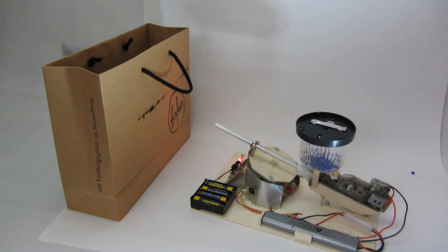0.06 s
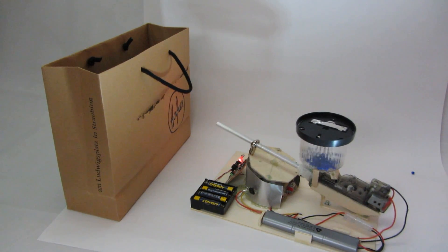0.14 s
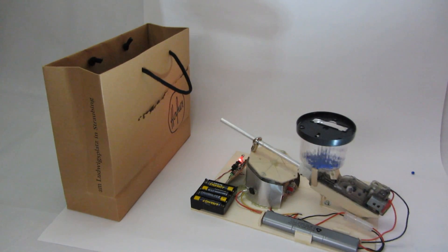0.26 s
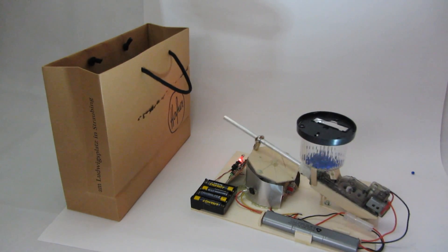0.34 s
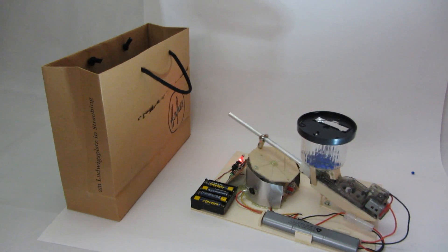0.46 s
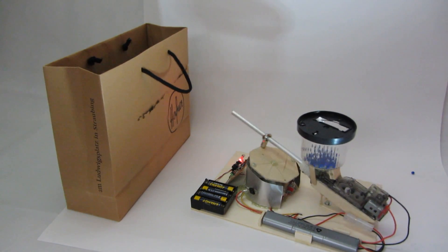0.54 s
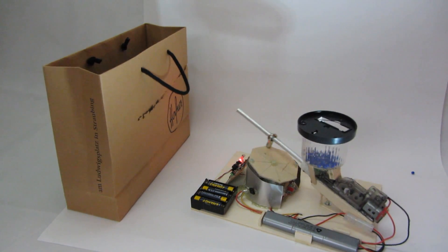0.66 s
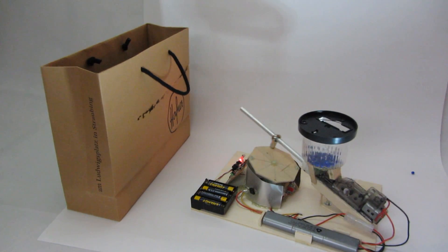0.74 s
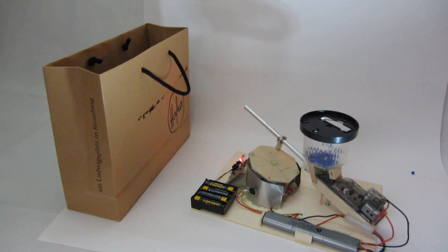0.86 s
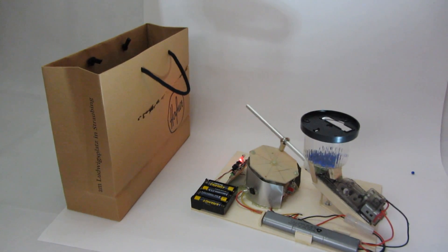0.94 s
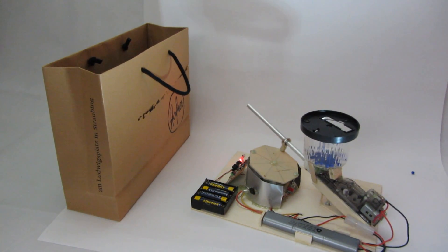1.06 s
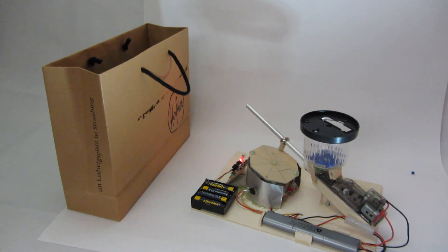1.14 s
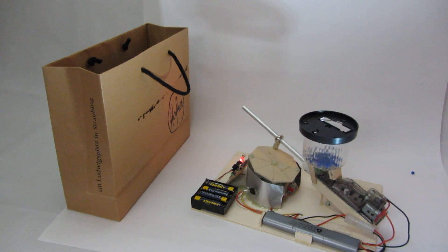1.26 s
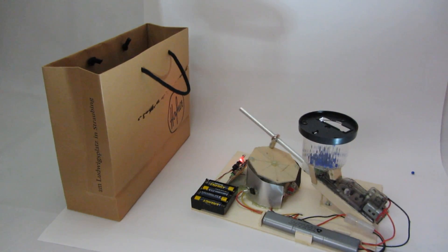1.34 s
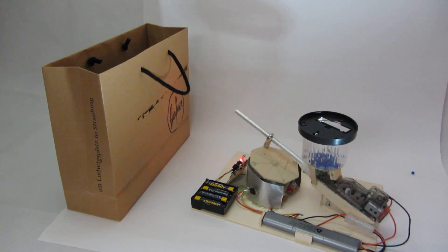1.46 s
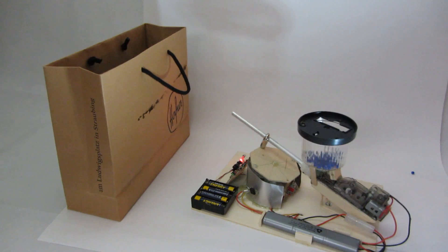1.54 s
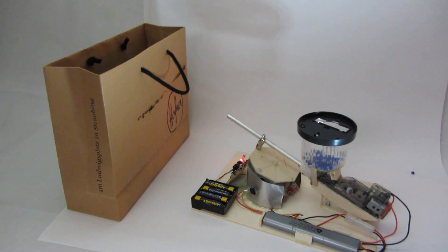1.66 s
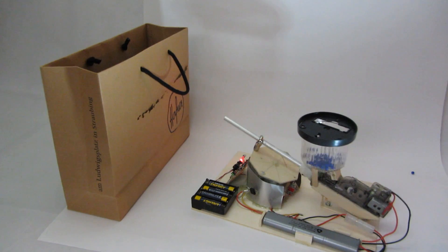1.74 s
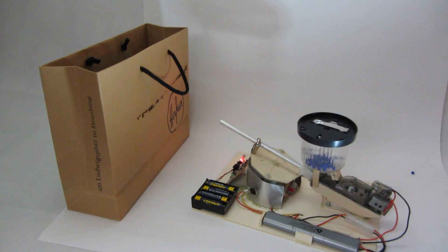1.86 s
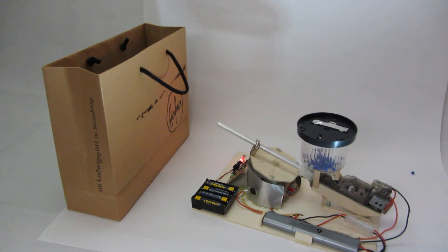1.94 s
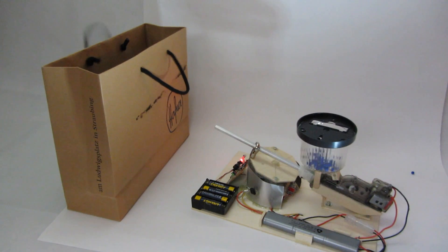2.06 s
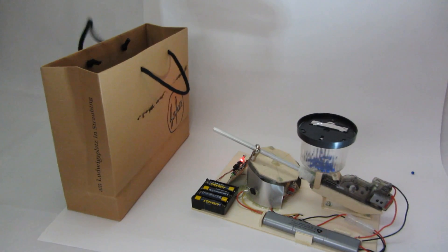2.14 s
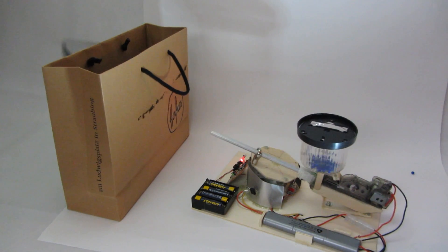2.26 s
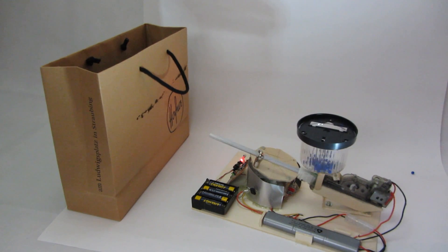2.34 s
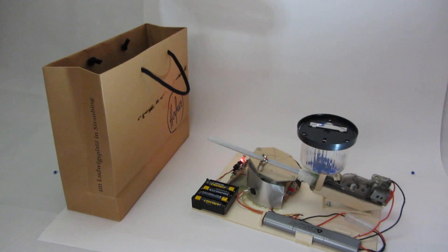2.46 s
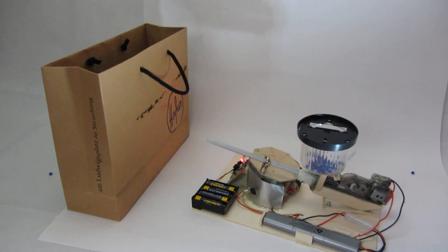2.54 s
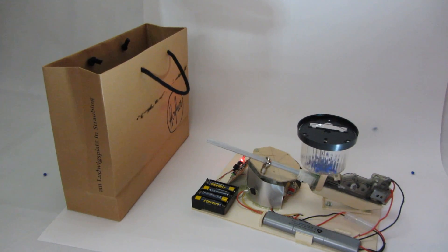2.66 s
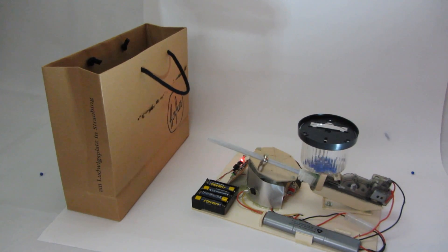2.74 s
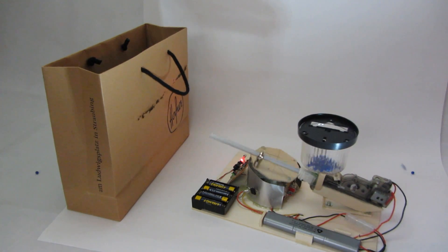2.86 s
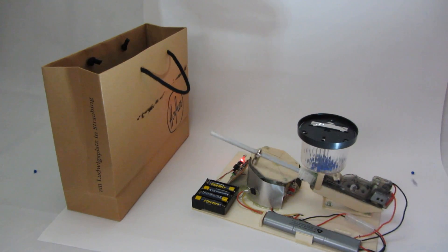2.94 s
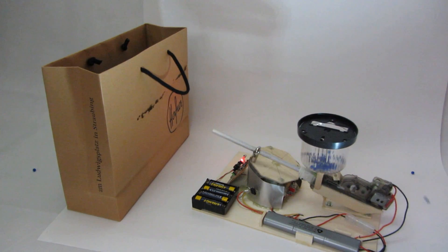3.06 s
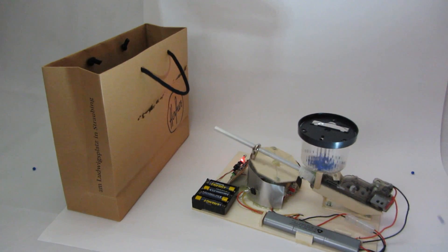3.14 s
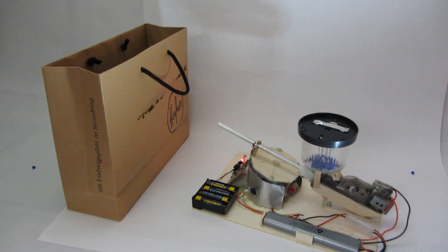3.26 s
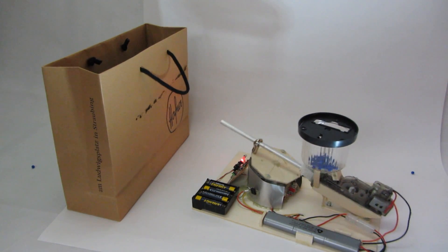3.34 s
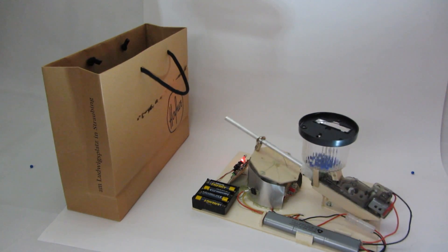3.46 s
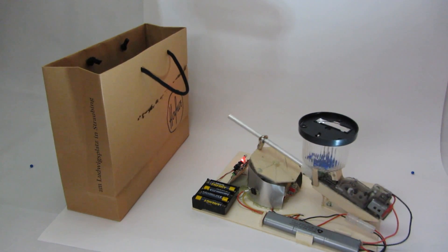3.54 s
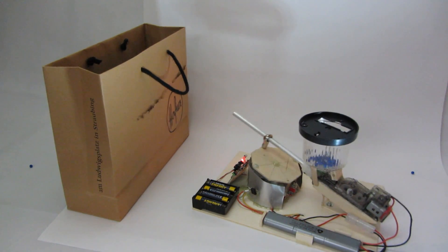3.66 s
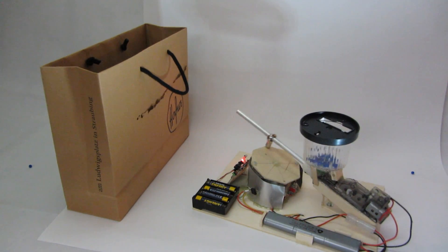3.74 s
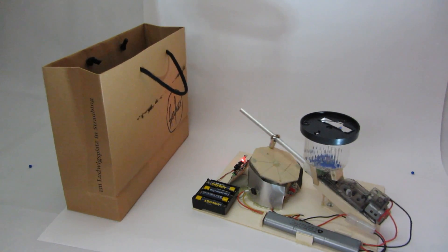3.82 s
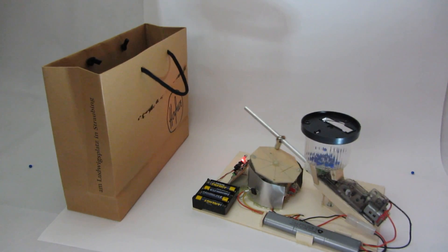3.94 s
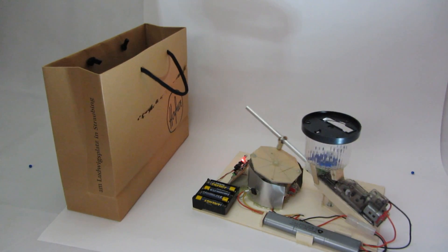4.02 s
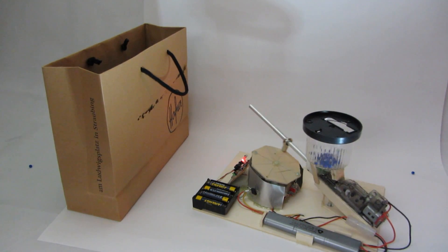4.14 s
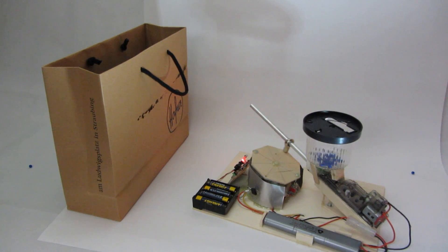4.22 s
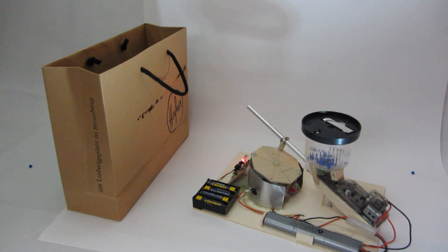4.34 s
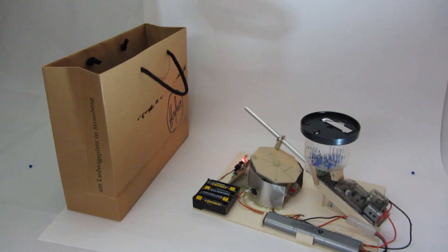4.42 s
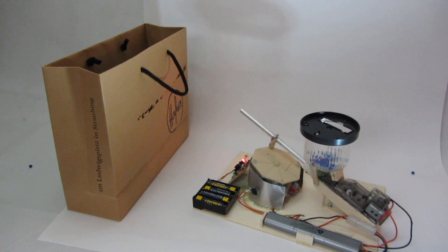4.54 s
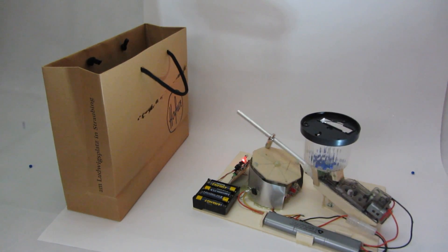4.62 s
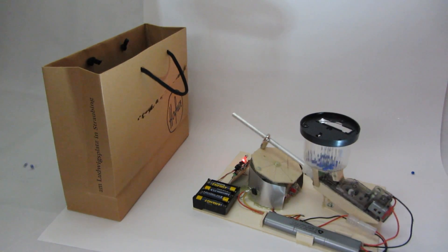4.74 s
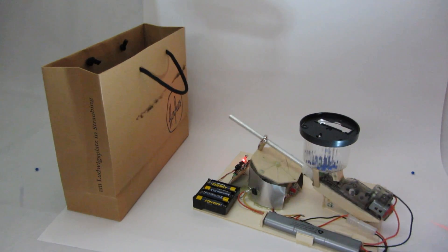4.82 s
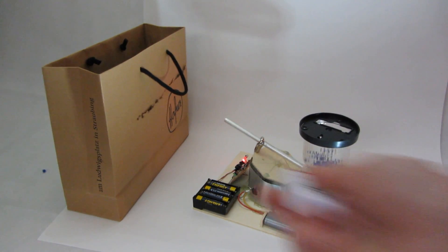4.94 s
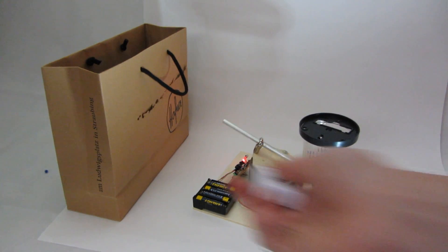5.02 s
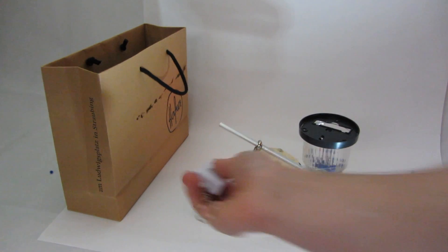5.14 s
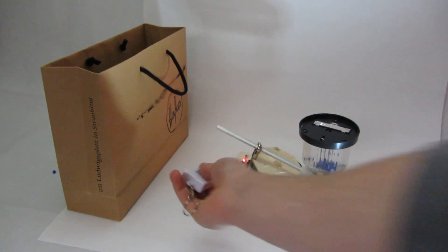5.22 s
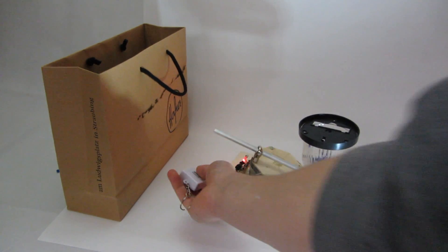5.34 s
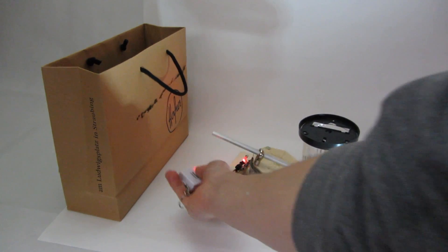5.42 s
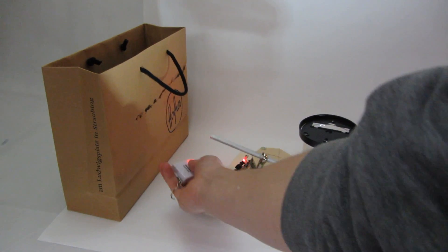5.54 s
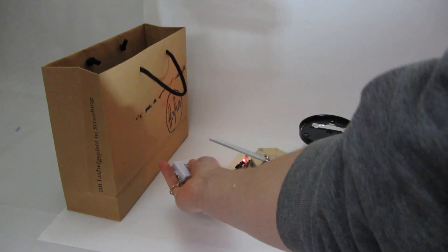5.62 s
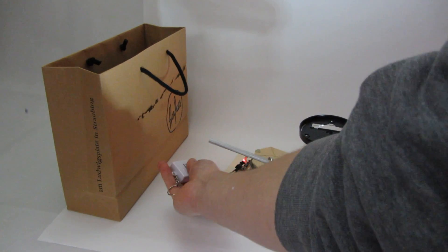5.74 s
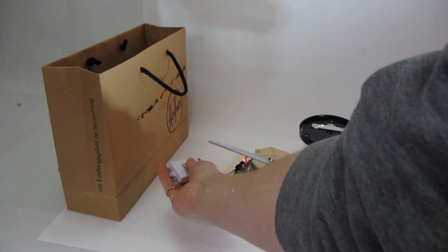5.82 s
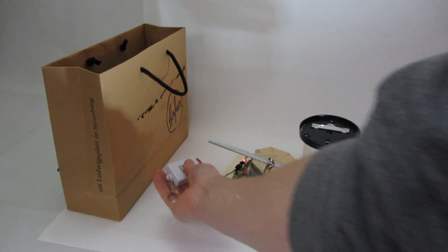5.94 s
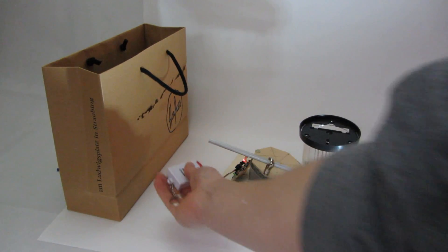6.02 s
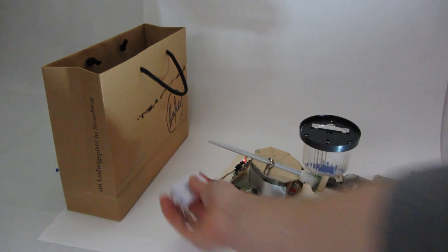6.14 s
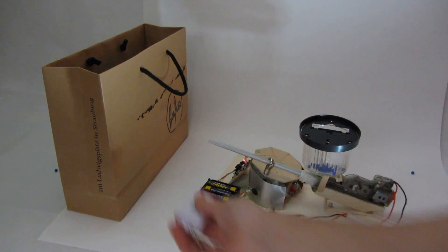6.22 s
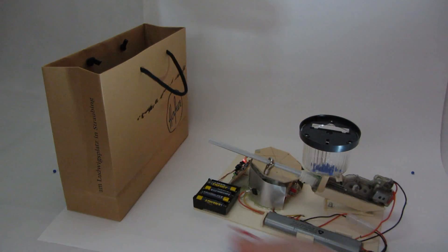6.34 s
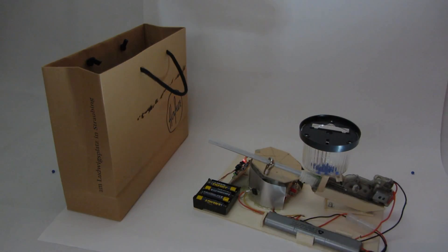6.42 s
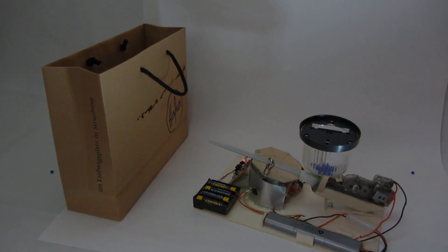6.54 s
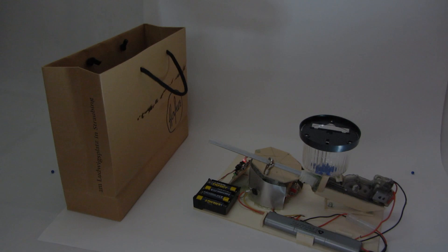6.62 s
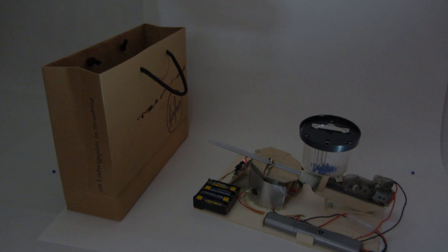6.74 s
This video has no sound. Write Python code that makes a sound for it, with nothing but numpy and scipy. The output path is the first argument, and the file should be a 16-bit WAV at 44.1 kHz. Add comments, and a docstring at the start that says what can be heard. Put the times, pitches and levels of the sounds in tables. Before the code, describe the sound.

From 0 to about 5.7 seconds a small electric pellet gun fires without pause, some eight shots a second, evenly spaced but slightly different each time. Every cycle has a hard gear clack, then about 20 milliseconds later a chattering release, piston slam and short papery slap as the pellet hits a bag. The frame rings briefly and brightly, around 3 kHz. Between shots a gritty geared whirr swells with the spring load, and pellets rebound with small cracks and dull knocks. Irregular muzzle puffs pop the microphone, strongly around 0.5, 1.7, 2.2, 3.4, 4.8 and 5.2 seconds. At 5.7 the trigger is released and the whirr drops away within a few tenths. From 5.9 to 6.7 quiet stray pellets tick and roll on paper and board, thinning over faint rustle and fading room hush. Close stereo, slightly stronger right, short indoor reflections.

```python
"""A small motor-driven pellet gun on a board fires eight shots a second into a paper bag, indoors, in stereo.
In each cycle a gear catches the piston, the spring lets go and the piston slams home: impacts excite frame
modes. The pellet then slaps the bag, muzzle air puffs at the microphone ports, and pellets rebound as grain
bursts. The geared whirr follows the spring load until the trigger is let go and it dies away. Last, stray
pellets roll and tick as decaying noise while the filtered-noise hush fades out."""
import sys
import numpy as np
from scipy import signal
from scipy.fft import rfft, irfft, next_fast_len
from scipy.io import wavfile

SR = 44100
rng = np.random.default_rng(int(sys.argv[2]) if len(sys.argv) > 2 else 0)


def undo_db(level):
    """Turn decibels back into plain size, where 20 dB means ten times bigger."""
    steps = np.asarray(level, float) / 20
    return 10 ** steps


def materialize(psi):
    """Save the field psi as 16-bit PCM at rate SR to the path in sys.argv[1].

    A 1-D psi becomes a single channel; in a 2-D psi each row is a channel.
    """
    bounded = np.clip(np.atleast_2d(psi).T, -1, 1)
    quanta = np.round(bounded * 32767).astype(np.int16)
    wavfile.write(sys.argv[1], SR, quanta)


N = 298998  # samples
RELEASE_S = 5.705  # the trigger is let go


def rms_one(x):
    """Normalisation: scale to unit rms."""
    return x / np.sqrt(np.mean(x ** 2) + 1e-20)


def colour(x, points):
    """Minimum-phase filtering: a folded cepstrum gives a causal, unit-energy response along a spectrum table."""
    hz, level_db = np.transpose(points)
    grid = np.maximum(np.arange(1025) * SR / 2048, 1)
    log_gain = np.log(undo_db(np.interp(np.log(grid), np.log(hz), level_db)))
    cepstrum = irfft(log_gain)
    cepstrum[1:1024] *= 2
    cepstrum[1025:] = 0
    taps = irfft(np.exp(rfft(cepstrum)))
    taps = taps / np.sqrt(np.sum(taps ** 2))
    return signal.oaconvolve(x, taps * np.ones(x.shape[:-1] + (1,)), axes=-1)[..., :N]


def split(x, hz):
    """Band splitting: third-order parts below and above a frequency."""
    return [signal.sosfilt(signal.butter(3, hz, kind, fs=SR, output="sos"), x) for kind in ("low", "high")]


def resonate(x, hz, width_hz):
    """Forced resonance: one damped pole pair with a gain of about 1 at its peak."""
    r = np.exp(-np.pi * width_hz / SR)
    return signal.lfilter([1 - r, 0, r - 1], [1, -2 * r * np.cos(2 * np.pi * hz / SR), r * r], x)


def clicks(s, gains):
    """Impulse excitation: single samples at the given times."""
    out = np.zeros(N)
    places = np.clip(np.round(np.asarray(s) * SR).astype(int), 0, N - 1)
    np.add.at(out, places, gains)
    return out


def swell(train, rise_s, fall_s):
    """Relaxation: two first-order lags turn each click into a quick rise and an exponential fall."""
    a, b = np.exp(-1 / (rise_s * SR)), np.exp(-1 / (fall_s * SR))
    falling = signal.lfilter([1], [1, -b], train + 1e-18)
    return signal.lfilter([1 - a], [1, -a], falling)


def grains(per_s, spread_db, apart=0.89):
    """Shot noise: random impacts of uneven size, partly shared by the two ports, normalised to unit rms."""
    sizes = undo_db(spread_db * np.minimum(rng.exponential(1, (3, N)), 5)) * rng.choice([-1, 1], (3, N))
    shared, *own = sizes * (rng.random((3, N)) < per_s / SR)
    own = signal.lfilter([1.5, -.8], [1], own)  # the sides are less alike in the treble
    return rms_one(shared + apart * own)


def strike(s, db, modes, scatter_db):
    """Modal superposition: each blow starts decaying sines within 1.2 ms, in strengths that vary by blow and port."""
    out = np.zeros((2, N))
    chance = rng.standard_normal((len(s), len(modes), 3))
    late = rng.random((len(s), len(modes)))
    for k, (hz, level_db, t60) in enumerate(modes):
        r, w = undo_db(-60 / (t60 * SR)), 2 * np.pi * hz / SR
        blow_db = db + level_db + scatter_db * chance[:, k, 0]
        trains = [clicks(s + .0012 * late[:, k], undo_db(blow_db + 4.1 * chance[:, k, side])) for side in (1, 2)]
        out += signal.lfilter([0, np.sin(w)], [1, -2 * r * np.cos(w), r * r], np.array(trains) + 1e-18)
    return out


# firing cycles: gear catch t/s, relative catch level/dB, slam delay/ms, relative slam level/dB, relative slap level/dB
CYCLES = [(.0003, -11, 21.5, -23, -16), (0.1262, -10, 21, -18.5, -19.5), (0.2509, -13, 22.3, -17.5, -18.5),
          (0.375, -11.5, 24, -15.5, -19), (0.5014, -10.5, 24, -16.5, -20), (.6269, -11, 23.6, -14.5, -20),
          (0.7526, -11.5, 23.2, -17.5, -21.5), (.878, -11, 21.5, -16.5, -22), (1.0042, -10, 24, -16.5, -23),
          (1.1324, -12.5, 21.8, -18.5, -19.5), (1.2604, -11, 23.6, -20.5, -23.5),
          (1.3858, -10.5, 23.5, -15, -18), (1.51, -10.5, 23, -13, -20), (1.6343, -11, 24.2, -19, -16),
          (1.7609, -13, 22.7, -15.5, -15.5), (1.8863, -12, 25.3, -18.5, -15),
          (2.0126, -12, 23.6, -17, -18.5), (2.1381, -11.5, 18.6, -20, -21.5),
          (2.2636, -14.5, 20.3, -18.5, -21.5), (2.388, -15, 21.7, -17.5, -25),
          (2.5126, -13.5, 22.5, -18, -20.5), (2.6378, -13, 21.7, -16.5, -20.5),
          (2.7614, -13.5, 21.8, -19, -21.5), (2.8846, -12.5, 20.7, -18.5, -21),
          (3.01, -14.5, 20.2, -18.5, -21.5), (3.1354, -13, 22.4, -16.5, -23), (3.261, -11, 23.6, -13, -19),
          (3.3855, -10, 23.3, -16, -19), (3.5136, -11.5, 22.7, -17, -22.5), (3.6406, -10, 24.6, -20, -18.5),
          (3.7665, -11.5, 24, -14, -19), (3.8925, -12.5, 20.6, -18, -17), (4.017, -9, 21.4, -14.5, -20.5),
          (4.1425, -9.5, 24, -16.5, -20), (4.2705, -11, 21.4, -16, -20), (4.3964, -10, 22.2, -20, -19.5),
          (4.5218, -9.5, 21.3, -18.5, -19.5), (4.647, -9.5, 21, -21, -20.5),
          (4.7719, -11, 23.4, -13.5, -22), (4.8968, -12, 22.4, -17, -22), (5.0226, -14.5, 25.5, -16, -21),
          (5.1496, -12, 22.5, -26, -16), (5.2754, -13.5, 22.7, -16, -24), (5.399, -15, 21.4, -23, -20.5),
          (5.5247, -16.5, 21.3, -19, -17.5), (5.6503, -14.5, 19.9, -27, -19)]
# free vibrations of the gun frame: f/Hz, relative level/dB, T60/s
FRAME_MODES = [(872, -15, 0.053), (1373, -3.5, 0.031), (2480, -31, 0.0079), (2780, 0.5, 0.017),
               (2965, 0, 0.023), (3340, 1.5, .025), (4336, 1.5, 0.015), (4710, -1, 0.016),
               (5640, -24, .012), (6680, -6, 0.031), (7640, -2, 0.025), (8312, -43, .01)]
# spectrum of hard contacts: f/Hz, relative level/dB
CRACK_SPECTRUM = [(59, -56), (100, -18.5), (1360, -5), (2220, -4), (3050, -2.5), (3940, -10.5),
                  (4570, -8.5), (5900, -7), (8460, -10.5), (12000, -30), (16000, -30)]


def mechanism():
    """Impact excitation: touch, catch with two bounces, release chatter and slam with rebound ring the frame."""
    s, catch_db, slam_ms, slam_db, _ = np.transpose(CYCLES)
    slam = s + slam_ms / 1000
    contacts = np.concatenate([s - .0013, s + 0.00019, s + .0042, s + 0.0079, slam, slam + 0.0052])
    db = np.concatenate([catch_db - 8, catch_db, catch_db - 6.0, catch_db - 11, slam_db + 6.5, slam_db + 5.5])
    burst = swell(clicks(contacts, undo_db(db + 3.0)), 0.00067, 0.002) * grains(20000, spread_db=2.0)
    crack = colour(burst, CRACK_SPECTRUM)

    # the last gear tooth slips off: a growing chatter rings the frame near 3 kHz and, less, near 1.7 kHz
    luck_db = 4 * rng.uniform(-0.84, 1, len(s))  # from shot to shot
    slips = [(.016, -4.5), (0.0187, 6)]  # time after the catch/s, relative level/dB
    chatter = swell(sum(clicks(s + after, undo_db(slip_db + luck_db)) for after, slip_db in slips), 0.0013, 0.0019)
    chatter = chatter * grains(9000, spread_db=2.5)
    ring = resonate(chatter, 3060, 360) + undo_db(-8.5) * resonate(chatter, 1680, 500)
    ring = ring + undo_db(-30) * colour(chatter, CRACK_SPECTRUM)
    return crack + ring + strike(contacts, db - 11, FRAME_MODES, scatter_db=1.8)


# free vibrations of the paper bag: f/Hz, relative level/dB, T60/s
BAG_MODES = [(178, -23.5, 0.051), (262, -14, 0.1), (371, -2.5, 0.12), (438, -6.5, 0.07), (545, -3.5, 0.1),
             (658, -6.5, 0.044), (819.5, -7.5, 0.19), (1150, -18, 0.032), (1430, -25, 0.071),
             (1640, -1, 0.065), (1900, 0, 0.029)]
# spectrum of shaken paper: f/Hz, relative level/dB
PAPER_SPECTRUM = [(59, -40.5), (100, -10.5), (736, -1), (1390, 3), (2800, 4.5), (3780, -5.5), (5900, -2),
                  (9020, -8.5), (12000, -22), (16000, -22)]


def bag_slap():
    """Membrane excitation: pellet and muzzle air shake the paper into brief crackle over its ringing modes."""
    s, slam_ms, bag_db = np.transpose(CYCLES)[[0, 2, 4]]
    hit = s + slam_ms / 1000
    crackle = swell(clicks(hit, undo_db(bag_db + 11.5)), 0.0032, 0.0082) * grains(9000, spread_db=2.0)
    crackle = split(colour(crackle, PAPER_SPECTRUM), 130)[1]
    return crackle + strike(hit + .003, bag_db - 11, BAG_MODES, scatter_db=4.0)


# strong puffs of muzzle air at the microphone ports: centre t/s, left level/dB, right level/dB, width/ms
PUFFS = [(.025, -23, -14.5, 1.9), (0.1503, -15, -20, 1.9), (0.5305, -10, -10, 2.6),
         (0.6563, -11.5, -10, 2.8), (.906, -18, -12, 3.7), (1.416, -22, -10.5, 5.6),
         (1.6602, -15, -4.5, 2.2), (1.7852, -18, -14.5, 5.3), (2.1646, -11, -2, 2.8),
         (2.2914, -6.5, -3.5, 5.2), (3.2897, -12, -8.5, 2.4), (3.414, -3.5, -27, 3.4),
         (3.6661, -34, -11, 1.7), (3.7942, -29, -14, 1.5), (3.9222, -11, -13, 4.6),
         (4.672, -18, -17.5, 1.9), (4.8016, -6, -8, 4.5), (4.929, -13, -7.5, 3.3), (5.0501, -25, -9, 2.8),
         (5.1781, -16, -4.5, 3.6), (5.306, -14, -7, 2.1)]


def port_pops():
    """Pressure pulses: muzzle air pushes the ports in opposite senses, faintly after every slam, at times strongly."""
    out = np.zeros((2, N))
    s, slam_ms = np.transpose(CYCLES)[[0, 2]]
    faint_db = -21 + 3.0 * rng.standard_normal((len(s), 2))
    faint = np.column_stack([s + slam_ms / 1000 + 0.00338, faint_db, np.full(len(s), 1.63)])
    for at, left_db, right_db, width_ms in np.concatenate([faint, PUFFS]):
        push = rng.choice([-1, 1]) * np.hanning(round(width_ms * SR / 1000)) ** 0.44
        i = round(at * SR) - len(push) // 2
        out[:, i:i + len(push)] += np.outer([undo_db(left_db), -undo_db(right_db)], push)
    return out


# pellets rebounding between shots: t/s, relative level/dB, brightness/dB
REBOUND_HITS = [(0.0631, -11.5, 10), (0.446, -16, 16), (.8384, -25, 12), (0.9552, -19, 14),
                (1.0877, -19, 11), (1.2047, -14, 12), (1.3298, -19, 17.5), (1.5, -17, 14),
                (2.3322, -18, 18), (2.4493, -15.5, 10), (2.506, -21, 12), (2.5644, -8, 3.5),
                (2.697, -17, 15), (2.821, -11, 17), (2.945, -16.5, 13), (3.0709, -13.5, 16.5),
                (3.108, -18, 19.5), (3.1203, -18, 0), (3.1954, -15, 10), (3.3285, -13, 10),
                (3.864, -22, -6), (3.968, -12, 11), (4.0837, -10, 11.5), (4.1298, -10.5, 10),
                (4.3436, -13.5, 11), (4.4658, -21, 22), (4.6304, -27, 15), (5.36, -21, 8),
                (5.4727, -20, 18)]


def rebounds():
    """Contact stiffness: brightness shares each hit between a hard crack and a dull knock on the bag."""
    # 45 fainter rebounds fall at random
    faint = rng.uniform([0, -34.5, 0], [RELEASE_S, -24.5, 18], size=(45, 3))
    s, db, bright_db = np.transpose(np.concatenate([REBOUND_HITS, faint]))
    crack = swell(clicks(s, undo_db(db - 5.5 + bright_db / 2)), 0.00031, 0.0051) * grains(17000, spread_db=0.5)
    rattle = swell(clicks(s, undo_db(db - 7.5 - bright_db / 2)), .0015, 0.011) * grains(5400, spread_db=-2.0)
    rattle = split(colour(rattle, PAPER_SPECTRUM), 3000)[0]
    knock = strike(s, db - 20 - bright_db / 2, BAG_MODES, scatter_db=4.0)
    return colour(crack, CRACK_SPECTRUM) + rattle + knock


# gearbox shell resonances: f/Hz, width/Hz, relative level/dB
SHELL_RESONANCES = [(3273, 70, 0), (3515, 70, -2), (4549, 120, -15), (5749, 150, -14), (6487, 60, -1),
                    (7612, 150, -15)]
# spectrum of the whirr: f/Hz, relative level/dB
WHIRR_SPECTRUM = [(35, -57), (60, -18), (785, -2.5), (1220, -4.5), (1740, -3.5), (2580, -4), (3500, -0.5),
                  (4030, -7.5), (4420, -5), (7940, -8.5), (12000, -26.5), (16000, -25.5)]
# load through one cycle as the spring is wound: time after the catch t/ms, relative level/dB
SPRING_LOAD = [(0, -45.5), (18, -24), (45, -31.5), (58, -28), (72, -24.5), (95, -31), (122, -29.5)]


def motor():
    """Forced vibration: gear teeth and loose pellets chatter with the spring load and ring the gearbox shell."""
    t, s = np.arange(N) / SR, np.transpose(CYCLES)[0]
    since_ms = 1000 * (t - s[np.maximum(np.searchsorted(s, t) - 1, 0)])
    load = undo_db(np.interp(since_ms, *np.transpose(SPRING_LOAD)))
    # the whirr dies at 130 dB/s; the shell keeps ringing until the gears stand, then falls at 170 dB/s
    whirr_db = 1.2 - 130 * np.maximum(t - RELEASE_S, 0)
    shell_db = -17 - 170 * np.maximum(t - 6.01, 0)

    # contacts come in clumps
    clumps = rms_one(swell(np.abs(grains(160, spread_db=5.5)[0]), 0.0016, 0.0045) + .05)
    steady = grains(3000, spread_db=2.5) * (.9 + .55 * clumps)
    teeth = grains(7000, spread_db=1.5) * (0.82 + 0.28 * clumps)
    shell = 0
    for hz, width_hz, db in SHELL_RESONANCES:
        shell = shell + undo_db(db) * resonate(resonate(steady, hz, width_hz), hz, 3 * width_hz)
    return load * (undo_db(whirr_db) * colour(teeth, WHIRR_SPECTRUM) + undo_db(shell_db) * rms_one(shell))


# pellets ticking after the last shot: t/s, relative knock level/dB, knock centre f/Hz, relative tick level/dB
PELLET_TICKS = [(5.871, -59, 2760, -30), (5.894, -43, 826, -44), (5.925, -58.5, 2800, -38),
                (5.945, -58, 2730, -35), (5.995, -62, 2800, -38), (6.005, -43, 474, -46),
                (6.03, -42, 1500, -39.5), (6.044, -39, 448, -46), (6.135, -38.5, 1430, -36),
                (6.198, -51, 1470, -62), (6.22, -61, 468, -45), (6.252, -49.5, 1320, -36.5),
                (6.274, -52, 2370, -44), (6.304, -49.5, 2140, -44), (6.374, -48, 1360, -61),
                (6.422, -57, 2680, -47), (6.479, -54, 1690, -47), (6.528, -45, 705, -51),
                (6.586, -44, 1190, -48), (6.651, -45, 633, -60), (6.684, -53, 573, -52),
                (6.738, -52, 1670, -55)]


def ticks():
    """Damped impact noise: stray pellets drop and roll, a dull rattle on paper and a bright tick on the board."""
    s, knock_db, centre_hz, tick_db = np.transpose(PELLET_TICKS)
    rattle = split(colour(grains(4000, spread_db=3.5), PAPER_SPECTRUM), 3000)[0]
    dull = np.zeros((2, N))
    fall = np.exp(-np.arange(6000) / SR / 0.015)  # decay constant 15 ms
    for at, db, hz in zip(s, knock_db, centre_hz):
        i = round(at * SR)
        shaken = undo_db(db) * rattle[:, i:i + len(fall)] * fall[:N - i]
        dull[:, i:i + len(fall)] += shaken + undo_db(5.5) * resonate(shaken, hz, 270)
    tick = swell(clicks(s, undo_db(tick_db)), .0002, 0.0092) * grains(9000, spread_db=2.0)
    bright = split(colour(tick, PAPER_SPECTRUM), 4200)[1]
    return undo_db([[1.5], [-.6]]) * (dull + undo_db(3.5) * bright)


def room(x):
    """Reverberation: ten reflections a side off board and backdrop, then eight dulling feedback delays."""
    t60_s, wall_cut_hz = 0.25, 4900  # decay before the dulling; low-pass of each pass
    size = next_fast_len(N + SR)
    w = 2 * np.pi * np.arange(size // 2 + 1) / size
    dull = 1 / (1 + 1j * w * SR / (2 * np.pi * wall_cut_hz))
    near_s, far_s = rng.uniform(0.00102, .009, (2, 10)), rng.uniform(0.012, .037, (2, 8))
    out = []
    for side, near, far in zip(x, near_s, far_s):
        response = sum((-1) ** k * undo_db(-23.5) * np.exp(-1j * w * round(lag * SR)) for k, lag in enumerate(near))
        for k, lag in enumerate(far):
            loop = undo_db(-60 * lag / t60_s) * dull * np.exp(-1j * w * round(lag * SR))
            response = response + (-1) ** k * undo_db(-15.5) * loop / (1 - loop)
        out.append(irfft(rfft(side, size) * response, size)[:N])
    return np.array(out)


# spectrum of room noise and rustle: f/Hz, relative level/dB
HUSH_SPECTRUM = [(12, -47), (20, -21), (130, 3.5), (388, 1), (513, 4), (1260, -6.5), (2320, -6.5),
                 (6720, 0), (11000, -16), (16000, -22)]
# fading of the hush: t/s, level below 3.5 kHz/dB, level above/dB
HUSH_FADE = [(5.8, -52, -58), (5.938, -64.5, -65), (6.064, -59.5, -55), (6.254, -61.5, -67),
             (6.402, -60.5, -59), (6.538, -62, -65.5), (6.664, -66, -81), (6.78, -66, -81)]


def hush():
    """Filtered noise: quiet room noise and fine rustle that comes in patches, darkening as it fades."""
    s, low_db, high_db = np.transpose(HUSH_FADE)
    low, high = split(colour(grains(8700, spread_db=2.0, apart=1.0), HUSH_SPECTRUM), 3500)
    patches = swell(np.abs(grains(45, spread_db=2.5)), .003, .012) + 9.0
    t = np.arange(N) / SR
    low = undo_db(np.interp(t, s, low_db)) * rms_one(low * patches[0])
    high = undo_db(np.interp(t, s, high_db)) * rms_one(high * patches[1])
    return low + high


def scene():
    """Superposition: gun and bag arrive 2 samples later and 2 dB softer on the left, then room and hush join."""
    left, right = mechanism() + bag_slap() + rebounds() + motor()
    near = np.array([np.roll(left, 2), right]) * undo_db([[-1], [1]])
    near = near + ticks()
    return undo_db(-1.5) * (near + room(near)) + hush() + port_pops()


def top_cut(x):
    """Nothing passes above the cut-off."""
    return signal.sosfilt(signal.butter(12, 16850, fs=SR, output="sos"), x)


def record(dry):
    """Transduction: a small microphone cuts the bass, resonates at its port, rounds peaks and cuts the top."""
    cut = signal.sosfilt(signal.butter(2, 85, "high", fs=SR, output="sos"), dry)  # pops gain an undershoot
    cut = cut + 0.18 * resonate(cut, 10600, 1670)
    rounded = np.tanh(cut)
    finished = signal.sosfilt(signal.cheby2(10, 50, 16400, fs=SR, output="sos"), rounded)
    return top_cut(finished)


dry = scene()
out = record(dry)
materialize(out)
```